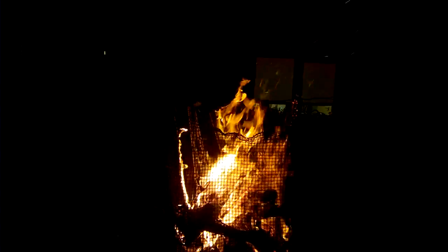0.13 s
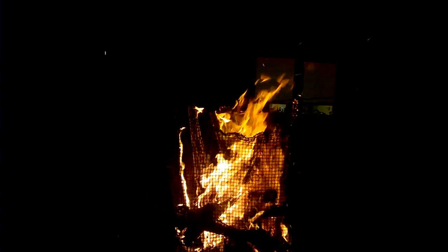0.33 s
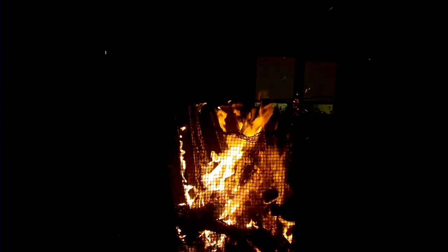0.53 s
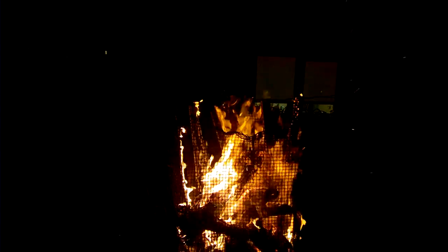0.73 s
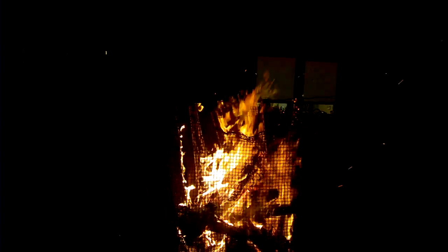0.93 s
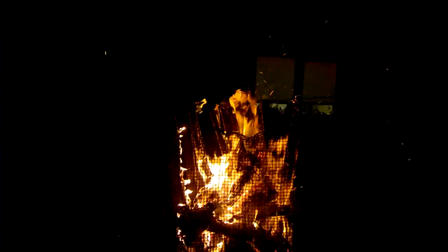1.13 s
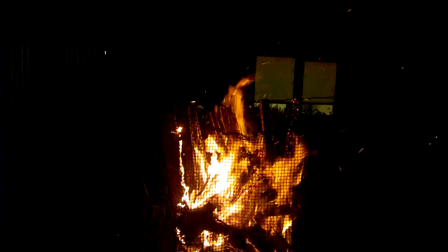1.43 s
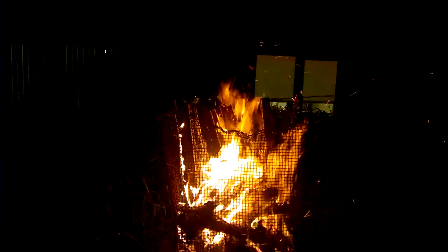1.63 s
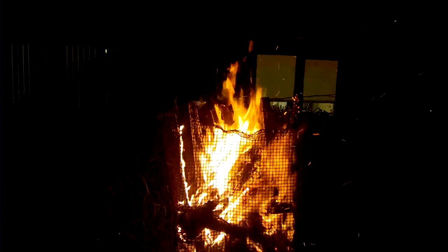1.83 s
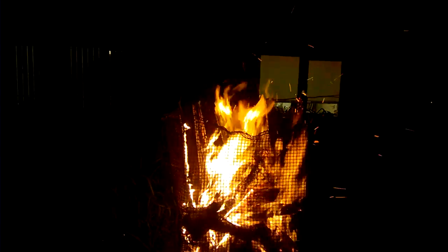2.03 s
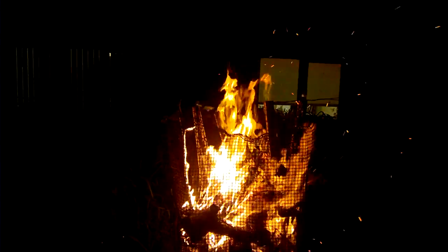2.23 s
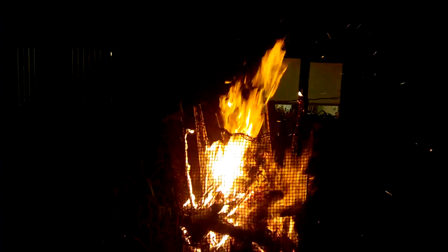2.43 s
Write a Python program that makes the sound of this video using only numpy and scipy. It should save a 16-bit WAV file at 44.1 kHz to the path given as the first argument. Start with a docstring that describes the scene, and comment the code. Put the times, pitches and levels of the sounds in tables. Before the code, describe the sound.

A wood fire burns outdoors a few metres from the microphone: low unsteady rumble and fluttering roar, sparse dry crackles with tiny trailing ticks, faint sizzling sap, and flames swelling in the last second over steady hiss.

```python
"""Wood fire outdoors

A wood fire burns a few metres from the microphone, and its flames flare up in the last second.
The flames are shaped noise: a rumble, a roar, a soft rush, and hollows in the stack that ring.
The logs give sparse, dry crackles, made of short noise bursts with a ringing splinter.
Sizzling sap, jets of steam and ember ticks lie beneath; the yard answers the wood weakly.
A steady hiss from the recorder lies under everything."""
import sys
import numpy as np
from scipy import signal
from scipy.fft import rfft, irfft, next_fast_len
from scipy.io import wavfile
from scipy.ndimage import uniform_filter1d, map_coordinates

SR = 44100
rng = np.random.default_rng(int(sys.argv[2]) if len(sys.argv) > 2 else 0)


def output_pcm(signal):
    """Save a mono or channel-first signal as 16-bit PCM at the path in sys.argv[1].

    Samples are clipped to [-1, 1] before scaling.
    """
    pcm = np.clip(np.atleast_2d(signal).T, -1, 1) * 32767
    wavfile.write(sys.argv[1], SR, np.round(pcm).astype(np.int16))


N = 114660  # samples, 2.6 s


def amp(db):
    """Decibels to gain."""
    return 10 ** (np.asarray(db) / 20)


def unit(x):
    """x brought to an rms level of 1."""
    return x / np.sqrt(np.mean(x ** 2) + 1e-20)


def along(points, hz):
    """Read (f/Hz, value) points at the frequencies hz, on a log axis."""
    f, value = np.transpose(points)
    return np.interp(np.log(hz + 1), np.log(f + 1), value)


def curve(rows):
    """One value per sample from (t/s, value) rows."""
    return np.interp(np.arange(N) / SR, *np.transpose(rows))


def wobble(rate):
    """A smooth random curve through `rate` random points a second."""
    points = rng.standard_normal(int(N * rate / SR) + 4)
    return map_coordinates(points, [np.arange(N) * rate / SR])


def swell(t, start, length):
    """One smooth rise and fall between 0 and 1."""
    return np.sin(np.pi * np.clip((t - start) / length, 0, 1))


def filtered(x, response):
    """x with each frequency scaled by response(frequency)."""
    m = next_fast_len(len(x) + 8192)  # the added silence leaves room for the filter's ringing
    spectrum = rfft(x, m) * response(np.fft.rfftfreq(m, 1 / SR))
    return irfft(spectrum, m)[:len(x)]


def noise(colour):
    """Random noise of rms 1 with the given spectrum."""
    return unit(filtered(rng.standard_normal(N), lambda hz: amp(along(colour, hz))))


def steadied(x, span_s):
    """x with its slow chance swells evened out, rms 1."""
    power = np.abs(uniform_filter1d(x ** 2, max(int(span_s * SR), 1)))
    return unit(x / np.sqrt(power + 1e-9))


# how long the yard's tail lasts: f/Hz, time to fall by 60 dB/s
YARD_DECAY = [(500, 0.68), (5000, 0.15), (14000, 0.039)]
YARD_DB, SCATTER_DB, SCATTER_T60_S = -11, -13, 0.05


def yard(x):
    """Scatter among the logs and a weak tail from the walls around, whose treble dies sooner."""
    hz, t, cells = signal.stft(rng.standard_normal(SR // 3), SR, nperseg=256)
    decay = amp(-60 * t / along(YARD_DECAY, hz)[:, None])
    tail = signal.istft(cells * decay, SR, nperseg=256)[1]
    scatter_decay = amp(-60 * np.arange(len(tail)) / SR / SCATTER_T60_S)
    scatter = rng.standard_normal(len(tail)) * scatter_decay
    answer = amp(YARD_DB) * tail / np.linalg.norm(tail)
    answer = answer + amp(SCATTER_DB) * scatter / np.linalg.norm(scatter)
    delayed = np.pad(answer, (SR // 1000, 0))  # about 1 ms later
    return signal.fftconvolve(x, delayed)[:N]


# tone of the boiling sap: f/Hz, relative level/dB
SIZZLE_COLOUR = [(1000, -29), (2800, -8.5), (3350, -1.5), (4100, -2.5), (5000, -1.5), (5500, -2),
                 (6050, -3.5), (6800, -9), (8500, -12.5), (14000, -11.5)]
# loudness of the boiling sap: t/s, level/dB
SIZZLE = [(0, -73.5), (.9, -73.5), (1.1, -72), (1.3, -74), (1.55, -72.5), (1.7, -73), (2.6, -72.5)]
SIZZLE_GRAIN_DB, SIZZLE_GRAINS_PER_S = -2.5, 460


def sizzle():
    """Sap boiling in the logs: a hiss made grainy by fast random changes of level."""
    grains = amp(SIZZLE_GRAIN_DB * wobble(SIZZLE_GRAINS_PER_S))
    return unit(noise(SIZZLE_COLOUR) * grains) * amp(curve(SIZZLE))


# steam and gas escaping from cracks in the logs:
# start t/s, length/s, level at the height of the swell/dB, pitch f/Hz, half-width f/Hz
JETS = [(0.155, 0.078, -71.5, 1520, 300), (0.948, 0.42, -80, 6000, 380), (1.472, 0.15, -74, 5600, 700),
        (2.15, 0.36, -74.5, 1500, 260), (2.177, 0.26, -78, 2250, 200)]


def jets():
    """Thin hisses of steam and wood gas that swell and fade, each at the pitch of its crack."""
    t, out = np.arange(N) / SR, 0
    for start, length, db, hz, width in JETS:
        band = lambda f: 1 / (1 + ((f - hz) / width) ** 2)
        hiss = unit(filtered(rng.standard_normal(N), band))
        out = out + amp(db) * swell(t, start, length) * hiss
    return out


# gaps in the stack that ring: f/Hz, width f/Hz, relative level/dB
HOLLOWS = [(118, 34, -14.5), (173, 8.1, -9), (223, 30.6, -4), (270.5, 11.5, -1), (300.1, 12, -6),
           (337, 7.4, -5), (362.3, 6.2, -10.5), (404.9, 7.4, -11.5), (524.5, 14, -20.5), (634.5, 11, -25.5)]
# how strongly the hollows ring together, before licks and trim: t/s, level/dB
RINGING = [(0, -57.5), (.12, -74.5), (.24, -66.5), (.35, -59), (.57, -56.5), (.88, -56.5), (1.0, -60.5),
           (1.35, -53), (1.61, -63.5), (1.76, -51), (1.87, -48.5), (2.13, -48), (2.22, -50), (2.42, -48),
           (2.6, -52)]
# tongues of flame that make a hollow sing: centre t/s, length/s, pitch f/Hz, lift level/dB
LICKS = [(0.344, 0.076, 270, 7), (.58, 0.19, 302, 8), (.72, .2, 270, 5.5), (0.901, 0.15, 270, 8),
         (1.087, 0.3, 338, 7), (1.237, .2, 173, 10.7), (1.813, 0.22, 122, 14.5), (1.868, 0.077, 270, 10),
         (1.9, 0.12, 232, 10), (1.999, 0.097, 302, 13.5), (2.065, .16, 232, 7), (2.134, 0.15, 270, 10.5),
         (2.368, 0.2, 173, 7), (2.43, 0.21, 270, 5.5)]
HOLLOWS_TRIM_DB, LICK_REACH_HZ = 1.2, 10


def licks(hz, t):
    """The lift in dB that passing tongues of flame give a hollow; it fades away from their pitch."""
    lift_db = 0
    for centre, length, pitch, lift in LICKS:
        nearness = np.exp(-((hz - pitch) / LICK_REACH_HZ) ** 2)
        lift_db = lift_db + lift * nearness * swell(t, centre - length / 2, length)
    return lift_db


def hollows():
    """Gaps in the stack resonate: narrow bands of noise that sing out when a flame licks through."""
    t, out = np.arange(N) / SR, 0
    total = np.sqrt(sum(amp(db) ** 2 for _, _, db in HOLLOWS))
    for hz, width, db in HOLLOWS:
        resonance = lambda f: 1 / (1 + 2 * ((f - hz) / width) ** 2)
        ring = filtered(rng.standard_normal(N), resonance)
        out = out + amp(db + licks(hz, t)) * steadied(ring, span_s=0.11)
    return out / total * amp(curve(RINGING) + HOLLOWS_TRIM_DB)


# tone of the soft rush of burning gas: f/Hz, relative level/dB
RUSH_COLOUR = [(200, -2.5), (500, 4.5), (800, 6.5), (1200, 0.5), (1500, 4.5), (1950, -5.5), (2300, -2),
               (2800, -9.5), (5000, -26.5), (10000, -29)]
# loudness of the rush before flicker and trim: t/s, level/dB
RUSH = [(0, -67.5), (.2, -70.5), (.35, -69.5), (.7, -71), (1.4, -71), (1.95, -73.5), (2.15, -71.5),
        (2.3, -69), (2.45, -71), (2.6, -66)]
RUSH_TRIM_DB, RUSH_FLICKER_DB = 1.5, 0.9


def rush():
    """Burning gas: a soft noise with a slight random flicker."""
    flicker_db = RUSH_FLICKER_DB * wobble(60)
    return noise(RUSH_COLOUR) * amp(curve(RUSH) + RUSH_TRIM_DB + flicker_db)


# tone of the low rumble of rising air: f/Hz, relative level/dB
RUMBLE_COLOUR = [(12, -28), (25, -2.5), (36, -2.5), (50, 0), (64, -6), (80, -9.5), (100, -10.5),
                 (120, -13.5), (145, -15.5), (200, -24.5), (500, -70.5), (2000, -92)]
# loudness of the rumble before trim: t/s, level/dB
RUMBLE = [(0.0, -46), (0.11, -55), (0.19, -49.5), (0.28, -53), (0.51, -45), (0.74, -53), (0.77, -45.5),
          (0.84, -55.5), (0.9, -45.5), (1.11, -54), (1.27, -48), (1.33, -54), (1.36, -46), (1.47, -52.5),
          (1.66, -50), (1.69, -52), (1.91, -46.5), (2.6, -47)]
RUMBLE_TRIM_DB = 1


def rumble():
    """Rising air: deep noise whose level heaves up and down."""
    return steadied(noise(RUMBLE_COLOUR), span_s=0.077) * amp(curve(RUMBLE) + RUMBLE_TRIM_DB)


# tone of the roar before tilting: f/Hz, relative level/dB
ROAR_COLOUR = [(60, -13), (110, 3), (145, -2.5), (220, 1.5), (300, -3.5), (370, 2.5), (460, -1), (530, -6),
               (610, -16), (900, -22), (1500, -54), (4000, -96)]
# loudness of the roar before tilt, flutter and trim: t/s, level/dB
ROAR = [(0, -57.5), (.09, -63.5), (.28, -63.5), (.42, -59.5), (.56, -51.5), (.65, -58.5), (.85, -57.5),
        (1.12, -57), (1.45, -57.5), (1.66, -57.5), (1.76, -52), (1.9, -54), (2.15, -54), (2.33, -56),
        (2.6, -54)]
# brightness of the roar, gained above the pivot and lost below it: t/s, level/dB
ROAR_TILT = [(0, -0.5), (.2, 3.5), (.55, -2.5), (.85, 1), (1.12, 2.5), (1.55, -3), (1.77, -0.5), (1.95, 4),
             (2.2, 3), (2.38, -1), (2.6, 3.5)]
ROAR_TRIM_DB, ROAR_PIVOT_HZ = -1, 330
FLUTTER_DB, FLUTTERS_PER_S = 2.74, 30


def roar():
    """Turbulent burning: fluttering noise whose tone turns brighter and darker."""
    even = steadied(noise(ROAR_COLOUR), span_s=0.078)
    dark = filtered(even, lambda f: 1 / (1 + (f / ROAR_PIVOT_HZ) ** 6))
    bright = even - dark
    tilt = amp(curve(ROAR_TILT))
    flutter_db = FLUTTER_DB * wobble(FLUTTERS_PER_S)
    return (dark / tilt + bright * tilt) * amp(curve(ROAR) + ROAR_TRIM_DB + flutter_db)


def flames():
    """The burning as a whole: rush, rumble and roar, with the hollows ringing."""
    return hollows() + roar() + rumble() + rush()


# what the wood lends to every snap: f/Hz, relative level/dB
SNAP_COLOUR = [(300, 1), (800, 27), (1400, 14), (2000, 8), (2400, 9), (2900, -2), (3500, 8), (4100, -3),
               (4900, 2.5), (5400, -4), (6200, -0.5), (7300, -5.5), (8200, -4.5), (12000, -4), (15000, -10)]
RISE_S = 0.00072
SPLINTER_DB, SPLINTER_T60_S = -9.5, 0.012  # the splinter's ring, relative to its snap


def snaps(rows):
    """Bursting gas pockets tear the fibres for a few milliseconds; a splinter rings at each pitch."""
    out, t = np.zeros(N + SR), np.arange(SR // 100) / SR  # each snap is cut at 10 ms
    rise = np.minimum(t / RISE_S, 1) ** 2
    for s, db, hz, octaves, t60 in rows:
        band = lambda f: amp(along(SNAP_COLOUR, f)) / (1 + (np.log2((f + 1) / hz) / octaves) ** 2)
        burst = rng.choice([-1, 1], len(t)) * rise * amp(-60 * t / t60)
        spectrum = rfft(burst, 2 * len(t))
        # partly level the spectrum, for a broad and more even burst
        tear = irfft(spectrum / np.sqrt(np.abs(spectrum) + 1e-9))[:len(t)]
        ring = rise * amp(-60 * t / SPLINTER_T60_S) * np.sin(2 * np.pi * hz * t)
        snap = unit(unit(filtered(tear, band)) + amp(SPLINTER_DB) * unit(ring))
        start = max(int(s * SR), 0)
        out[start:start + len(t)] += amp(db) * snap
    return out[:N]


TICKS_PER_S, TICK_FLOOR_DB, TICK_SPREAD_DB = 55, -83.5, 2
TICK_HZ, TICK_OCTAVES, TICK_T60_S = 4690, 0.53, 0.013


def embers():
    """Faint ticks of the embers, tiny snaps at random moments, levels and pitches."""
    count = int(TICKS_PER_S * N / SR)
    u = rng.random((count, 3))
    s = u[:, 0] * N / SR
    db = TICK_FLOOR_DB + TICK_SPREAD_DB * np.minimum(-np.log(1 - u[:, 1]), 3)
    hz = TICK_HZ * 2 ** (u[:, 2] - .5)  # up to half an octave either way
    return snaps(zip(s, db, hz, np.full(count, TICK_OCTAVES), np.full(count, TICK_T60_S)))


CRUMB_DB, CRUMB_DELAY_S = -18.5, 0.016  # level relative to the crackle, mean delay


def crumbs(crackles, count):
    """Breaking char: `count` smaller snaps trail every crackle, at nearby pitches."""
    rows = np.repeat(crackles, count, axis=0)
    u = rng.random((len(rows), 2))
    s, db, hz, octaves, t60 = rows.T
    later = s - CRUMB_DELAY_S * np.log(1 - u[:, 0])
    pitch = hz * 2 ** ((u[:, 1] - .5) / 2)  # up to a quarter octave either way
    return snaps(zip(later, db + CRUMB_DB, pitch, octaves, t60))


# gas pockets bursting in the logs: t/s, level before trim/dB, pitch f/Hz, half-width/octaves,
# time for the raw burst to fall by 60 dB/s
CRACKLES = [(.0101, -61.5, 5300, 0.79, 0.013), (.0456, -58.5, 5900, .4, .009),
            (.0855, -66, 7600, .54, .009), (.345, -71, 4640, .3, .015), (.4683, -62, 5400, .5, .009),
            (.4787, -65, 5200, 0.62, .009), (.4915, -65.5, 4200, 0.55, .009),
            (.6336, -59, 4300, 0.29, 0.0097), (.6366, -63.5, 6900, .7, .022),
            (.7308, -57.5, 6210, .36, 0.016), (.7985, -65.5, 4900, .35, .009),
            (.8985, -65.5, 5970, 0.36, .009), (1.0065, -66, 5650, 0.6, .012),
            (1.0326, -60.5, 5860, 0.23, .013), (1.0517, -53, 5830, 0.43, .009),
            (1.1250, -65, 5700, .16, 0.0099), (1.1938, -61.5, 3700, .45, .014),
            (1.2145, -64.5, 5800, 0.44, .016), (1.3662, -63, 3300, 0.71, 0.016),
            (1.425, -70, 4300, .2, .02), (1.4988, -63, 7260, .84, .02), (1.5150, -64, 4840, 0.13, .015),
            (1.5252, -62.5, 1400, .3, 0.018), (1.5256, -51, 6560, .75, .007),
            (1.5283, -61.5, 6400, .25, .014), (1.5638, -57.5, 4100, 0.69, .007),
            (1.6043, -62, 3600, .1, 0.0079), (1.7338, -66.5, 3400, 0.2, .009), (1.975, -69, 6070, .2, .009),
            (2.1360, -64.5, 3840, 0.4, .014), (2.1760, -62.5, 3600, 0.22, 0.0081),
            (2.1858, -66, 5460, 0.45, .009), (2.3055, -60.5, 1650, 0.31, 0.011),
            (2.4746, -62, 5150, .22, .008), (2.5472, -67, 4700, .8, .008)]
CRACKLE_TRIM_DB = -5.5


def crackles():
    """Gas pockets burst in the logs, and each crackle drops its crumbs."""
    return amp(CRACKLE_TRIM_DB) * (snaps(CRACKLES) + crumbs(CRACKLES, count=3))


def scene():
    """Sizzle, steam, flames and the crackling wood in the yard."""
    bed = sizzle() + jets() + flames()
    wood = embers() + crackles()
    return (bed + wood + yard(wood))[None]


# tone of the recorder's own hiss: f/Hz, relative level/dB
HISS_COLOUR = [(500, 5.5), (3000, 2), (6000, -1.5), (8500, -2), (11000, 0), (14000, -1.5), (17000, 0.5)]
HISS_DB, TOP_HZ = -73, 17135


def record(dry):
    """The recorder adds its own steady hiss and keeps nothing above its band limit."""
    hissing = dry[0] + amp(HISS_DB) * noise(HISS_COLOUR)
    return filtered(hissing, lambda hz: hz < TOP_HZ)[None]


dry = scene()
out = record(dry)
output_pcm(out)
```